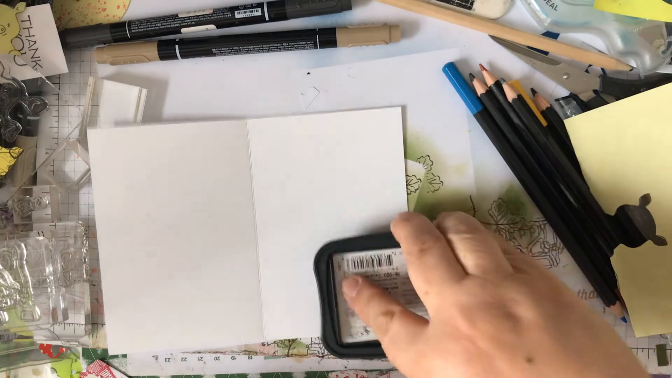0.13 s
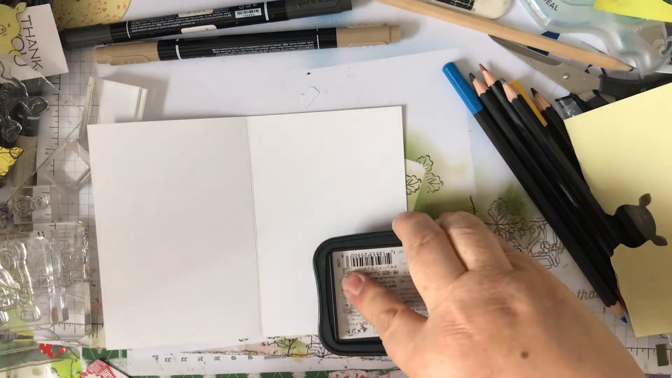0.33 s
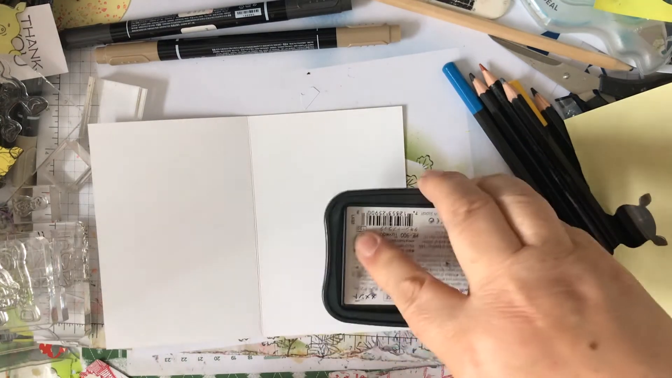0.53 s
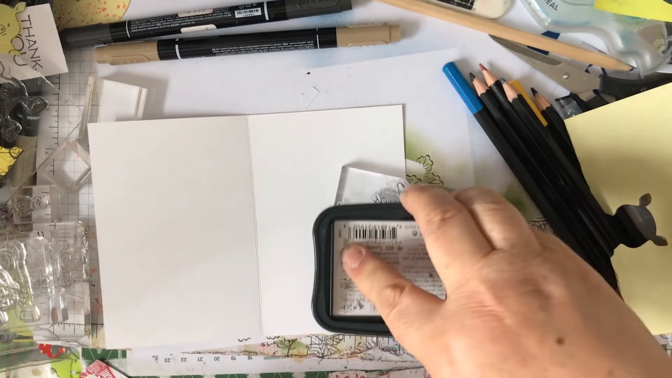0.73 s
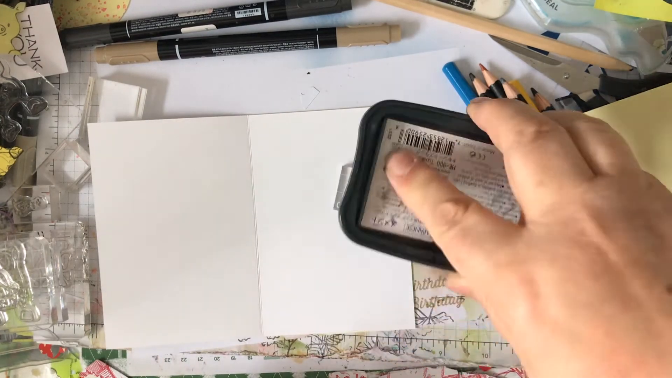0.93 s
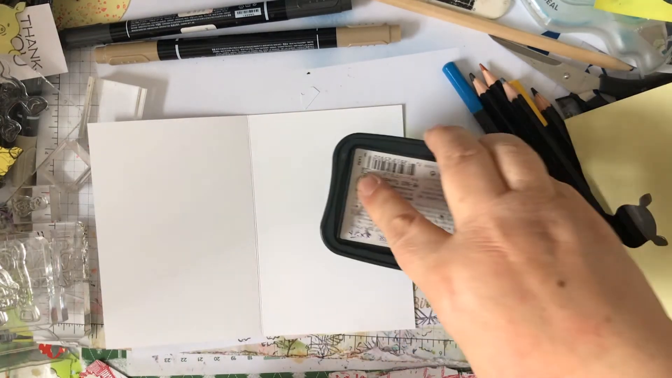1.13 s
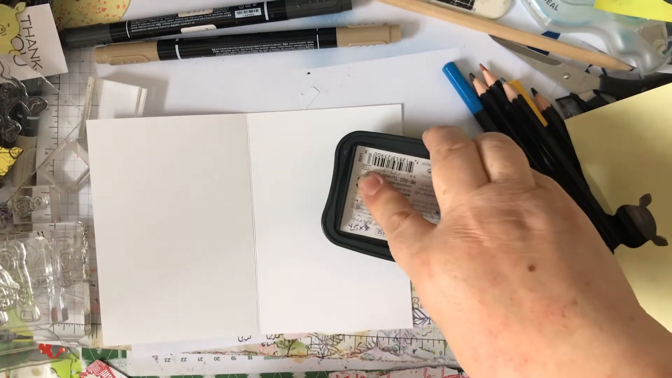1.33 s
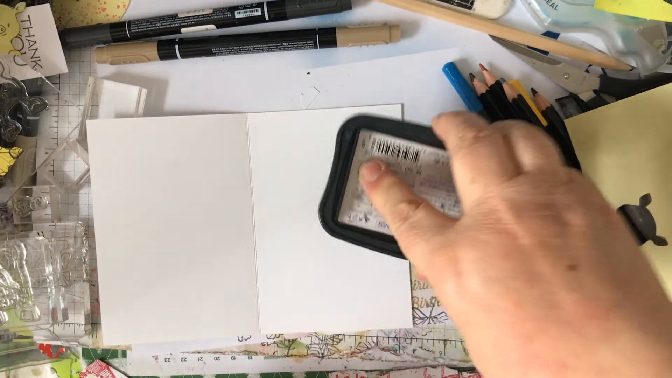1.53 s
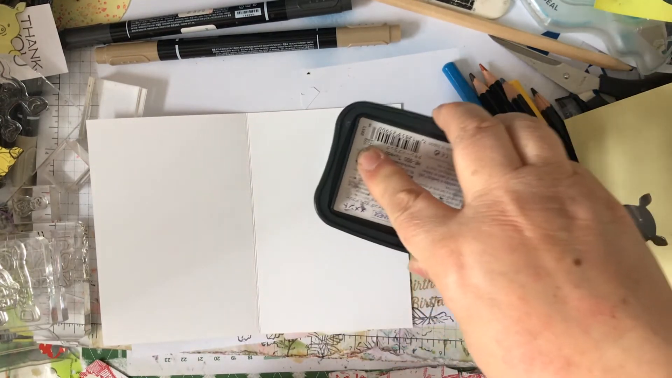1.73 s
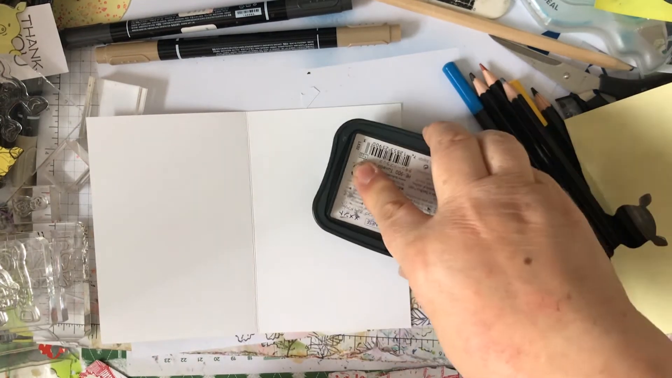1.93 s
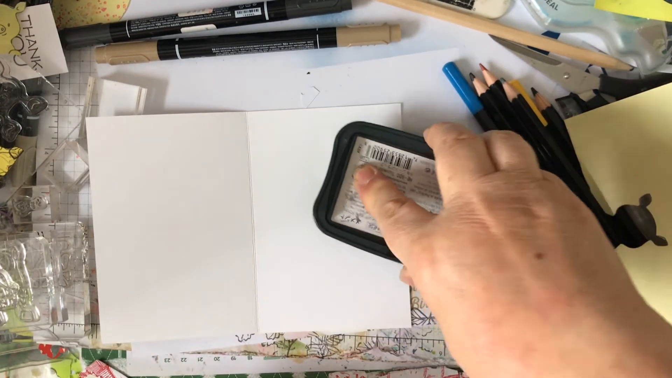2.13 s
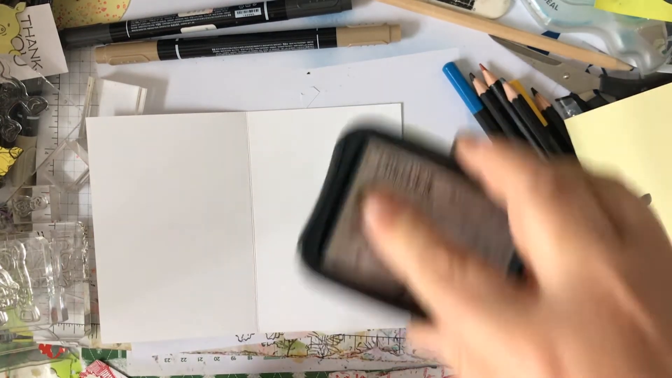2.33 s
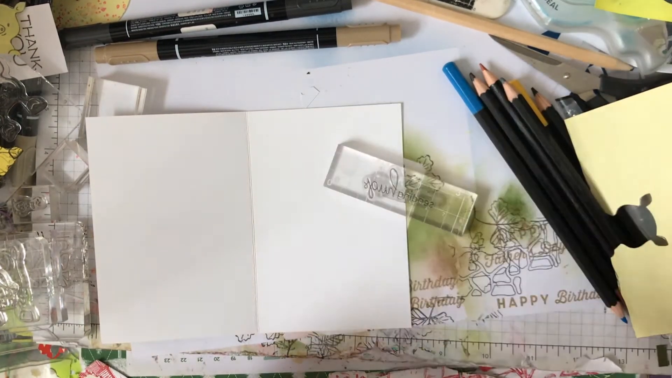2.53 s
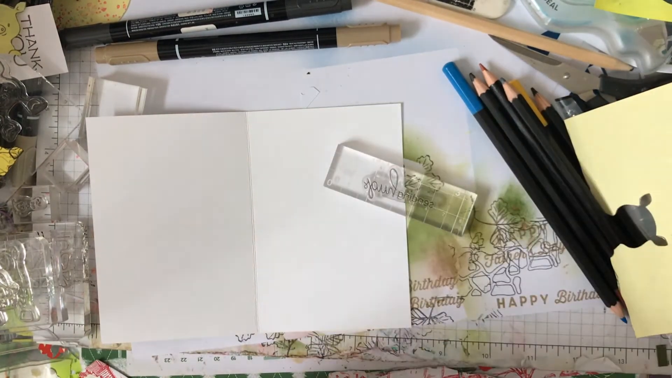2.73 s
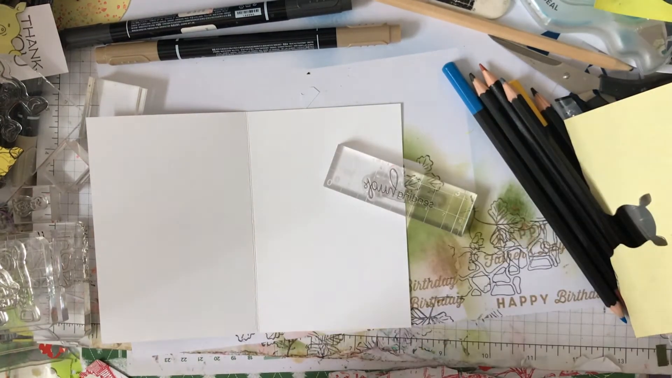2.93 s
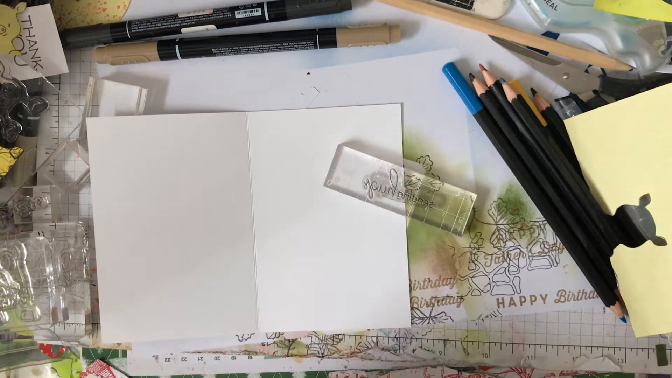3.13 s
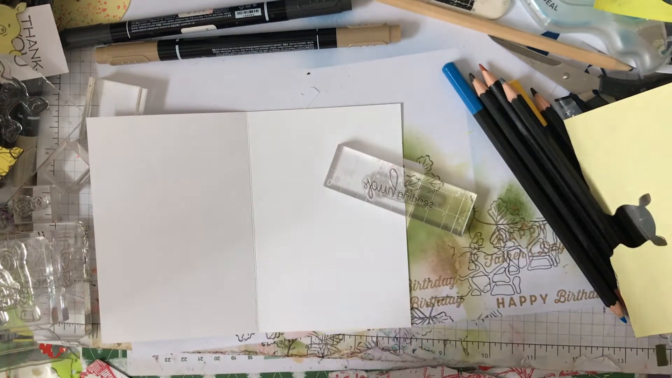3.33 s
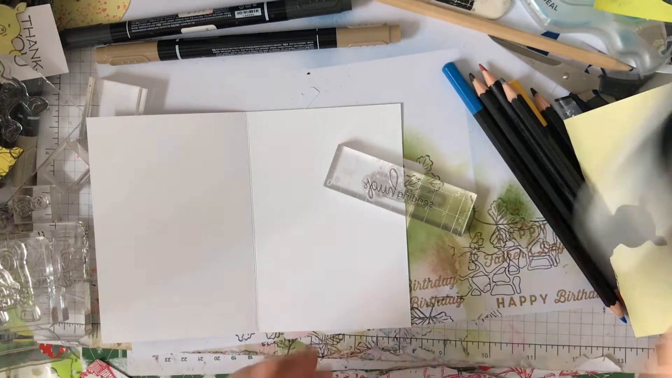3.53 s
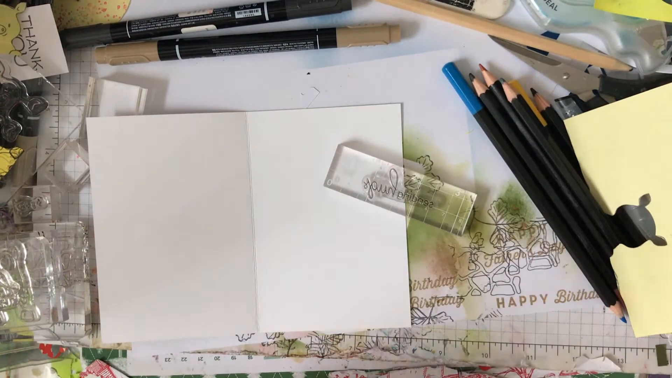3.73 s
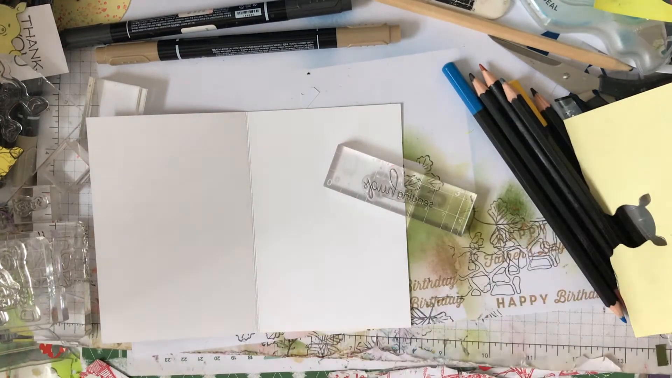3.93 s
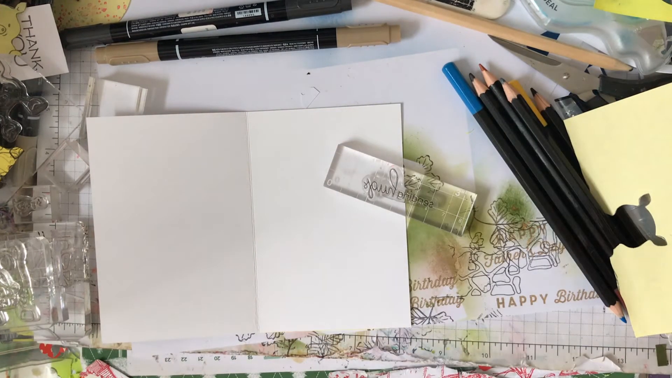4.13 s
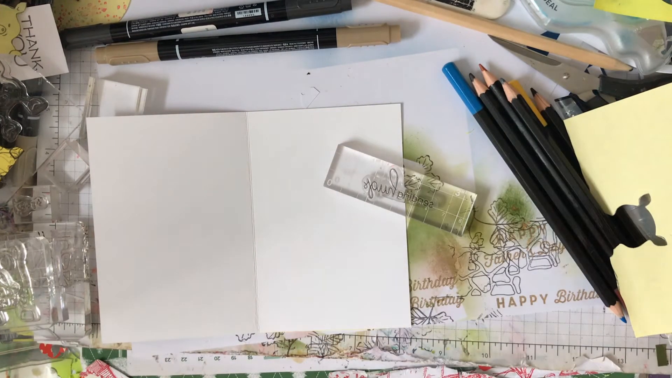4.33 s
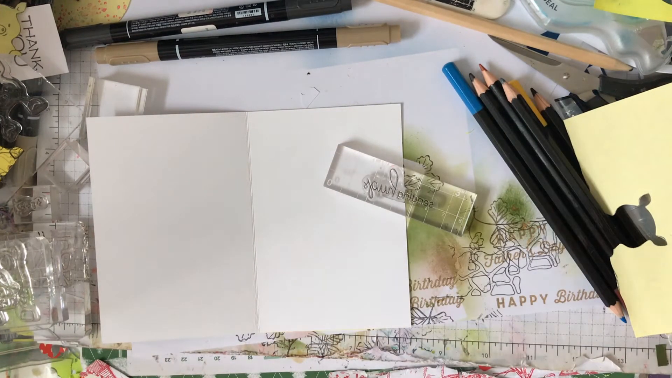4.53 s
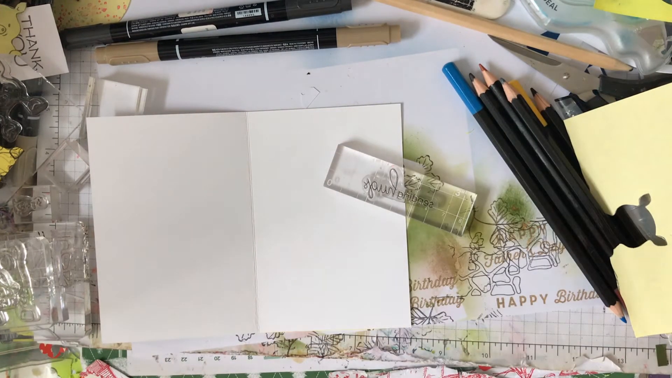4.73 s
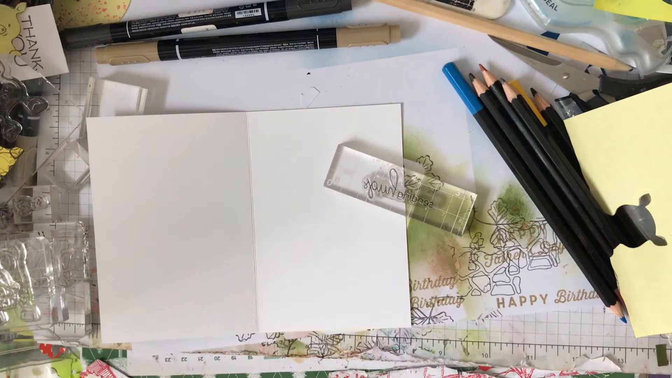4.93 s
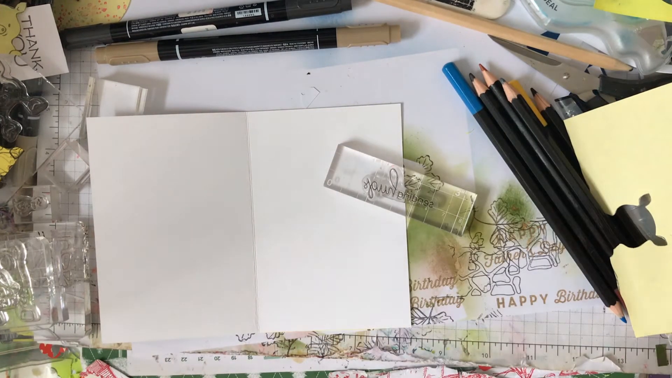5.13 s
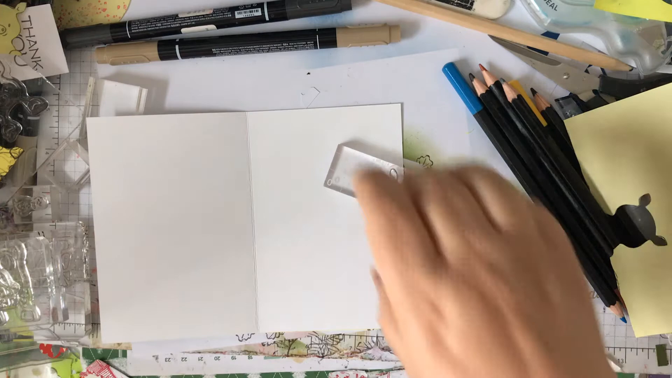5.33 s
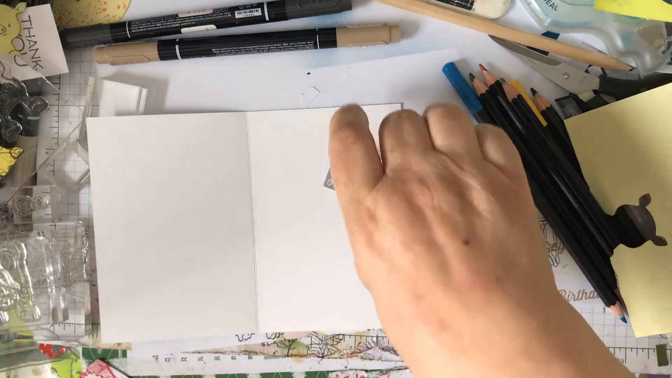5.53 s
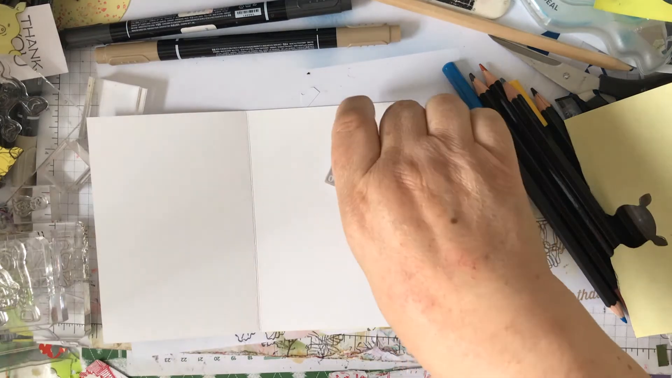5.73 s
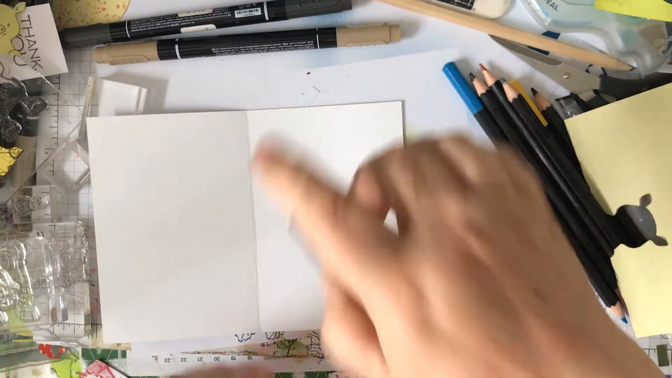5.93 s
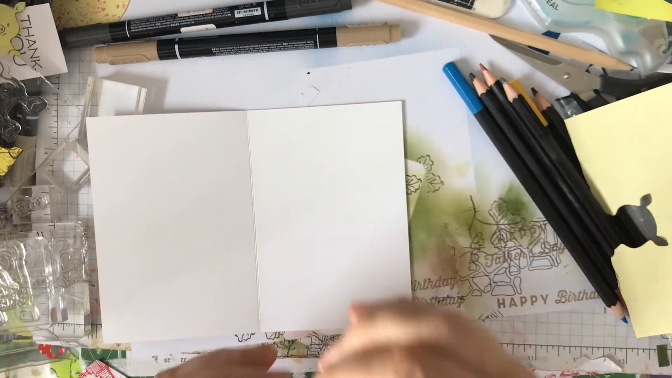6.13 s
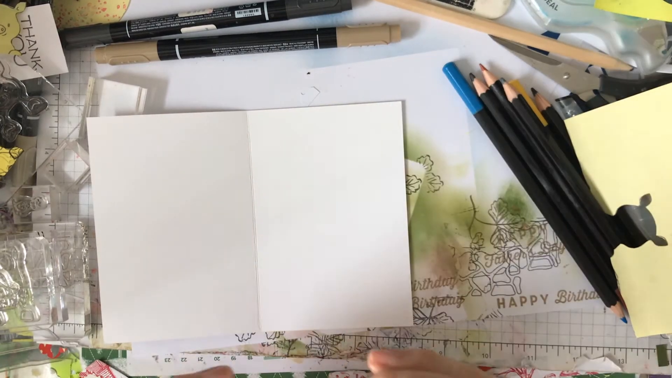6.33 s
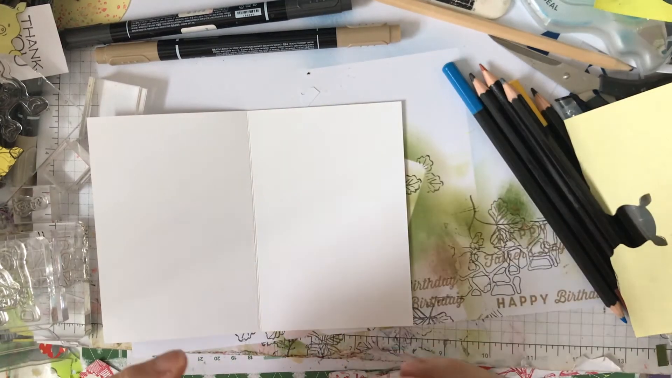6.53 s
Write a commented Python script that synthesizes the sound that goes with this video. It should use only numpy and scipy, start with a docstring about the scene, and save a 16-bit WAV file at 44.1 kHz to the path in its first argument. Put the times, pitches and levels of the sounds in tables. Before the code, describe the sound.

Close by on a cluttered desk, an ink pad thuds onto plastic, its lid snaps shut, the case clacks down, and a hand wipes softly.

```python
"""An ink pad is dabbed on an acrylic stamp block: each dab is a crack of noise with the pad's dull ring.
The plastic lid is clicked shut and the case set down: clicks and knocks ring hollow plastic in a small room.
Some blows thump the desk top, whose high notes swell first; each note is a fading sine wave.
A hand wipes to and fro: bright, uneven friction noise over the steady hiss of the phone's microphone.
"""
import sys
import numpy as np
from scipy import signal
from scipy.fft import rfft, irfft
from scipy.io import wavfile

SR = 44100
rng = np.random.default_rng(int(sys.argv[2]) if len(sys.argv) > 2 else 0)


def to_wav(s):
    """Save 16-bit WAV."""
    ch = np.atleast_2d(s).T  # columns
    pcm = np.round(np.clip(ch, -1, 1) * 32767)  # PCM
    wavfile.write(sys.argv[1], SR, pcm.astype(np.int16))


N = 290133

# Pad or fingertip meets block; contact time sets the pace of the force:
# (time [s], crack level [dB], crack centre [Hz], dull ring level [dB], contact time [ms])
DABS = [(.2055, -40, 2400, -40.5, 1.8), (.212, -42, 3130, -53.5, 24), (0.221, -44, 3440, -73, 2.3),
        (0.4467, -48.5, 2640, -67, 3.4), (.455, -50, 2620, -69, 5.2), (.548, -55.5, 2450, -74, 3.7),
        (0.654, -18, 3600, -29, 1.64), (.6582, -19, 4030, -18, 1.5), (.676, -40.5, 4200, -47, 1.6),
        (1.2896, -43.5, 2380, -59.5, 3.6), (1.296, -45.5, 3200, -55, 14), (1.462, -57, 3580, -54.5, 10.5),
        (1.531, -47, 3030, -63, 24), (1.5936, -46.5, 2210, -44.5, 0.67), (1.6249, -44.5, 3000, -50, 2.4),
        (1.6641, -17, 3120, -27.5, 1.6), (1.763, -57.5, 4000, -68, 2.4), (1.9505, -31.5, 2760, -25.5, 1.75),
        (2.019, -54, 4280, -59, 1.4), (2.185, -44.5, 4700, -58, 29), (2.242, -32.5, 5150, -36, 3.2),
        (2.313, -50, 4860, -70, 2), (4.079, -47.5, 7850, -64, 1.8), (5.523, -53.5, 5800, -78, 2),
        (5.562, -56.5, 6000, -78, 1.8), (5.607, -53, 3300, -58, 3.5)]
# Notes of the desk top: (frequency [Hz], relative level [dB], 60 dB fade time [s], build-up time [s])
DESK_NOTES = [(463, -10, 0.013, 0.0012), (402.3, 1.5, 0.029, 0.0018), (367, 2.5, 0.035, 0.0025),
              (268.4, -3, 0.058, 0.0046), (208, 3, 0.025, .007), (142.3, 10, 0.04, 0.01126),
              (114.8, 5.5, 0.077, 0.015), (79, -4, 0.11, 0.018), (48, -1.5, 0.17, 0.037)]
# Notes of the ink pad: (frequency [Hz], relative level [dB], 60 dB fade time [s])
PAD_NOTES = [(625, 6, 0.01196), (810, -12, 0.03), (970, 3.5, 0.028), (1300, 1, 0.0042), (1457, -2, 0.027),
             (1890, 0, 0.0041), (2500, -8, 0.0017)]
# Lid and case touch:
# (time [s], ring level [dB], ring centre [Hz], crack level [dB], contact time [ms])
LID_CLICKS = [(2.7236, -14.5, 2460, -22.5, 1.2), (2.7325, -32, 1920, -43, 8), (2.745, -35, 1940, -52, 41),
              (2.7668, -21, 1790, -21.5, 0.8), (2.7725, -28, 2590, -51, 3.9),
              (2.7938, -24.5, 1540, -59, 0.41), (2.8058, -49, 1600, -27.5, 1.04),
              (2.832, -46, 1310, -54, 14), (2.884, -43, 1630, -51, 26), (2.957, -37.5, 1470, -53, 21),
              (2.9782, -17, 1910, -23, 5.3), (2.9817, -12, 2040, -12.5, .6), (2.988, -33, 2170, -38, 18),
              (3.0300, -35.5, 2220, -32, 1.2), (3.417, -49, 3420, -41, 0.91),
              (3.449, -59.5, 2760, -52, 4.7)]
# Notes of the hollow case: (frequency [Hz], relative level [dB], 60 dB fade time [s])
CASE_NOTES = [(740, -3, .016), (1000, -4, .012), (1250, -4, .012), (1610, 0, .016), (1950, -1, .026),
              (2460, -3, .014), (2900, -2, .01), (3350, -2, .01), (3730, 2, .018), (4300, -3, .01),
              (5000, -4, .008), (5700, -3, .01), (6700, -5, .008)]
# Case and block touch the desk:
# (time [s], ring level [dB], ring centre [Hz], crack level [dB], contact time [ms])
DESK_KNOCKS = [(2.9805, -20, 750, -41, 1.24), (3.1185, -50, 606, -55, 0.65), (3.8093, -19, 740, -34, 0.7),
               (3.8125, -32.5, 650, -29, 1.65), (3.8725, -56, 2300, -43.5, 1.6),
               (3.912, -53, 1310, -71, 14), (3.936, -45, 784, -52, 2.1), (3.9693, -27, 1180, -34.5, 0.8),
               (3.978, -65.5, 990, -43, 14.7), (4.0082, -14, 1018, -15, 0.39),
               (4.0165, -19, 1690, -17, 1.4), (4.024, -28.5, 1400, -30, 1.3), (4.030, -39.5, 1100, -44, 22),
               (4.037, -28.5, 850, -40.5, 2.2), (5.625, -58, 943, -70, 12), (5.672, -48, 960, -52.5, 5.5),
               (5.70, -51.5, 1000, -56, 57), (5.735, -59, 1033, -51.5, 27), (5.78, -64, 1000, -59.5, 55)]
# Notes heard when case or block is set down: (frequency [Hz], relative level [dB], 60 dB fade time [s])
SHELL_NOTES = [(440, -8, .018), (560, -5, .018), (690, 0, .03), (834, 0, .042), (980, 0, .03),
               (1124, -2, .032), (1318, -2, .032), (1500, -5, .016), (1720, -2, .02), (2000, -2, .016),
               (2240, 1, .024), (2490, 0, .02), (2900, -3, .013), (3300, -2, .013), (4000, -5, .01)]
# Tone colour of the friction: (frequency [Hz], relative level per Hz [dB])
RUB_COLOUR = [(1300, -34), (2200, -12), (3200, -2), (5000, -3), (6200, 0), (9500, 0), (10500, -3),
              (12500, 1), (16000, -1)]
# Tone colour of the microphone hiss: (frequency [Hz], relative level per Hz [dB])
HISS_COLOUR = [(15, -29.5), (25, -1), (116, 1), (433, -7), (666, -10), (2120, -17.5), (3400, -18),
               (4620, -20), (9300, -24), (10400, -25), (15500, -22.5)]
# Blows that reach the desk top; the tilt is the level change for each octave down from the pivot:
# (time [s], level at the pivot [dB], tilt [dB per octave], sway of the whole desk [dB])
THUMPS = [(.206, -28, -4.5, -33.5), (0.454, -51.5, -2, -58), (.658, -16.5, -9.5, -43),
          (1.289, -32, -3, -38.5), (1.548, -62, 6, -56), (1.594, -35, -12.5, -58), (1.627, -36, -11, -64),
          (1.664, -23, -6.5, -46), (1.953, -17.5, -7.5, -31.5), (2.243, -29.5, -11, -53),
          (2.77, -50, -9.5, -80), (2.846, -55, -18, -63), (2.98, -28.5, -9, -62), (3.037, -55, -18, -76),
          (3.119, -39.5, -11.5, -86), (3.811, -33.5, -12.5, -75), (3.876, -52.5, -9, -76),
          (3.935, -52.5, -5.5, -84), (4.008, -40.5, -7.5, -76), (4.33, -55.5, 0, -67),
          (5.774, -58.5, -1, -82)]
# Slides of skin or paper, each speeding up and slowing down:
# (start [s], length [s], bright level mid-stroke [dB], body relative to bright part [dB])
STROKES = [(2.33, 0.22, -69, -9), (3.042, 0.062, -62.5, -17), (3.112, 0.29, -66, -6.5),
           (3.358, 0.19, -63.5, -8), (3.737, 0.22, -64, -8.5), (3.78, 0.37, -70, -0.5),
           (4.156, 0.17, -63, -16), (4.265, 0.23, -56, -12.5), (4.5, 0.22, -54, -15),
           (4.727, 0.2, -53.5, -13), (4.931, .14, -59, -13.5), (5.036, 0.12, -63, -24),
           (5.189, 0.29, -80.5, 5.5), (5.714, 0.085, -64.5, -1.5), (5.85, 0.31, -70.5, -6.5),
           (6.295, 0.26, -77, -6.5)]

HISS_DB = -67.5  # average (rms) level before the phone's top cut
ROOM_T60_S, ROOM_DB, ROOM_DELAY_S = 0.096, -14.5, 0.002
TOP_HZ = 16000
SPAN = 12000  # samples in a desk thump or the room's echoes; other blows get half
SPEED_POWER = 1.21  # friction gain grows with this power of speed
REST_DB, REST_FROM_S = -77.5, 2.83  # faint friction from here on: the hands are never quite still
PIVOT_HZ, SWAY_BELOW_HZ = 330, 60


def undb(db):
    """Turn decibels into gain."""
    return 10 ** (np.asarray(db) / 20)


def fade(t, t60):
    """Fall by 60 dB in t60 seconds; silent before time zero."""
    return (t >= 0) * np.exp(-np.log(1000) * np.maximum(t, 0) / t60)


def peak(x, db):
    """Scale a sound so that its peak has the given level."""
    return undb(db) * x / np.max(np.abs(x))


def colour(x, table):
    """Shape the spectrum by (frequency [Hz], level [dB]) points, then scale to rms 1."""
    hz, db = np.transpose(table)
    f = np.arange(len(x) // 2 + 1) * SR / len(x) + 1  # 1 Hz added to keep the logarithm finite
    gain = undb(np.interp(np.log(f), np.log(hz), db))
    y = irfft(rfft(x) * gain, len(x))
    return y / np.std(y)


def band(x, lo_hz, hi_hz):
    """Keep mainly the frequencies between two limits."""
    return signal.sosfilt(signal.butter(2, [lo_hz, hi_hz], "band", fs=SR, output="sos"), x)


def add(out, s, sound):
    """Mix a sound in at s seconds."""
    i = int(s * SR)
    out[i:i + len(sound)] += sound[:N - i]


def microphone_hiss():
    """The microphone's own steady noise, strongest in the bass."""
    return undb(HISS_DB) * colour(rng.standard_normal(N), HISS_COLOUR)


def room(x):
    """Add dense, short, fading echoes from the clutter and walls, a little weaker in the treble."""
    t = np.arange(SPAN) / SR - ROOM_DELAY_S
    noise = rng.standard_normal(SPAN)
    low, high = band(noise, 250, 3500), band(noise, 3500, 18000)
    tail = (low + 0.94 * high) * fade(t, ROOM_T60_S)
    tail = tail / np.sqrt(np.sum(tail ** 2))
    return x + undb(ROOM_DB) * signal.fftconvolve(x, tail)[:N]


def rubbing():
    """Friction is many slips of uneven size: bright hiss plus a duller body, loudest mid-stroke."""
    t = np.arange(N) / SR
    slip_db = np.minimum(2.7 * rng.exponential(size=N), 14)
    slips = colour(rng.standard_normal(N) * undb(slip_db), RUB_COLOUR)
    body = band(rng.standard_normal(N), 1080, 2700)
    body = body / np.std(body)
    out = undb(REST_DB) * np.clip((t - REST_FROM_S) / 0.29, 0, 1) * slips
    for s, length, db, body_db in STROKES:
        speed = np.abs(np.sin(np.pi * np.clip((t - s) / length, 0, 1)))
        out = out + undb(db) * speed ** SPEED_POWER * (slips + undb(body_db) * body)
    return out


def desk_thumps():
    """Slow bending waves build up late in the bass, so each thump falls in pitch."""
    out, t = np.zeros(N), np.arange(SPAN) / SR
    for s, level_db, tilt_db, sway_db in THUMPS:
        for hz, db, t60, build in DESK_NOTES:
            blow_db = level_db + tilt_db * np.log2(PIVOT_HZ / hz)
            if hz < SWAY_BELOW_HZ:
                blow_db = sway_db
            swell = 1 - np.exp(-(t / build) ** 2)
            decay = fade(t, t60) / fade(build, t60)  # equals 1 at the build-up time
            wave = np.sin(2 * np.pi * hz * (t - build))
            add(out, s, undb(db + blow_db) * swell * decay * wave)
    return out


def contact(t, contact_ms, drag_ms=9):
    """Force of a touch swells and fades; the longer the contact, the slower the swell."""
    phase = t / (max(contact_ms, .3) / 1000)
    steep = 0.078 + contact_ms / drag_ms
    return (2 * phase) ** steep * np.exp(steep - (2 * steep + 0.67) * phase)


def ring(t, modes, weight, scatter_db=4.5, detune=0.0087):
    """Fading notes, varied a little in strength and pitch each blow; neighbours push air opposite ways."""
    hz, db, t60 = np.transpose(modes)[:, :, None]
    chance = rng.standard_normal((2, len(hz), 1))
    sign = (-1) ** np.arange(len(hz))
    gain = (weight * sign)[:, None] * undb(db + scatter_db * chance[0])
    waves = np.sin(2 * np.pi * hz * (1 + detune * chance[1]) * t)
    return np.sum(gain * fade(t, t60) * waves, axis=0)


def strike(response, contact_ms, db, firm_ms=1.3):
    """Drive a ring by one firm impact and a trail of uneven small ones; long contacts are nearly all trail."""
    push = rng.standard_normal(len(response)) * contact(np.arange(len(response)) / SR, contact_ms)
    push = push / np.sqrt(np.sum(push ** 2)) * contact_ms / firm_ms / 2
    push[0] = np.exp(-contact_ms / firm_ms / 2)  # the firm impact
    struck = signal.fftconvolve(response, push)[:len(response)]
    return peak(band(struck, 300, 17000), db)


def crack(t, centre_hz, contact_ms, db, share=1.0, tail_db=-20, tail_t60=0.1):
    """Countless tiny surface vibrations: noise that follows the force, with a faint rustling tail."""
    force = contact(t, contact_ms) + undb(tail_db) * fade(t, tail_t60)
    noise = rng.standard_normal(len(t)) * force
    wide = band(noise, 1500, 18000)
    centred = band(noise, centre_hz / 1.82, min(centre_hz * 1.646, 16000))
    return peak(centred + share * wide, db)


def plastic_contacts(events, modes, spread_octaves, crack_hz):
    """Each touch mostly rings the plastic's notes near its centre; a long contact is a scrape."""
    out, t, hz = np.zeros(N), np.arange(SPAN // 2) / SR, np.array(modes)[:, 0]
    for s, ring_db, centre_hz, crack_db, contact_ms in events:
        weight = np.exp(-.5 * (np.log2(hz / centre_hz) / spread_octaves) ** 2)
        add(out, s, strike(ring(t, modes, weight), contact_ms, ring_db, firm_ms=2.97))
        add(out, s, crack(t, crack_hz, contact_ms, crack_db))
    return out


def dabs():
    """The pad meets the block: a crack, wider in pitch when louder, and the pad's dull ring."""
    out, t = np.zeros(N), np.arange(SPAN // 2) / SR
    for s, crack_db, crack_hz, pad_db, contact_ms in DABS:
        share = .8 * undb(.3 * (crack_db + 24))  # more wide noise in a louder dab
        add(out, s, crack(t, crack_hz, contact_ms, crack_db, share, tail_db=-17.5, tail_t60=0.091))
        add(out, s, strike(ring(t, PAD_NOTES, np.ones(len(PAD_NOTES))), contact_ms, pad_db))
    return out


def scene():
    """Mix the hiss, rubbing and desk thumps with the dabs, clicks and knocks, which get the room's echoes."""
    lid = plastic_contacts(LID_CLICKS, CASE_NOTES, spread_octaves=0.82, crack_hz=7740)
    knocks = plastic_contacts(DESK_KNOCKS, SHELL_NOTES, spread_octaves=1.0, crack_hz=4200)
    hits = dabs() + lid + knocks
    return (microphone_hiss() + rubbing() + desk_thumps() + room(hits))[None]


def record(dry):
    """The phone cuts the highest treble steeply."""
    return signal.sosfilt(signal.ellip(10, .2, 60, TOP_HZ, fs=SR, output="sos"), dry)


dry = scene()
out = record(dry)
to_wav(out)
```